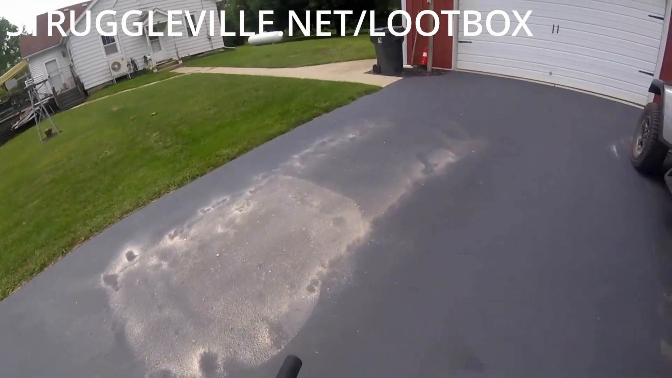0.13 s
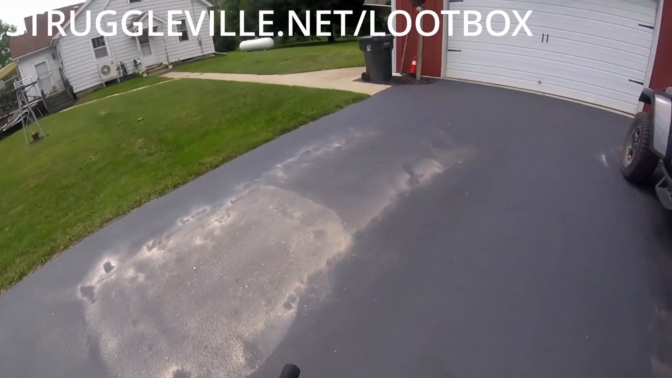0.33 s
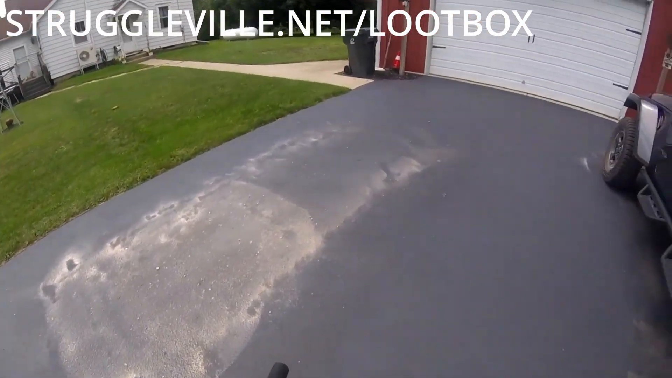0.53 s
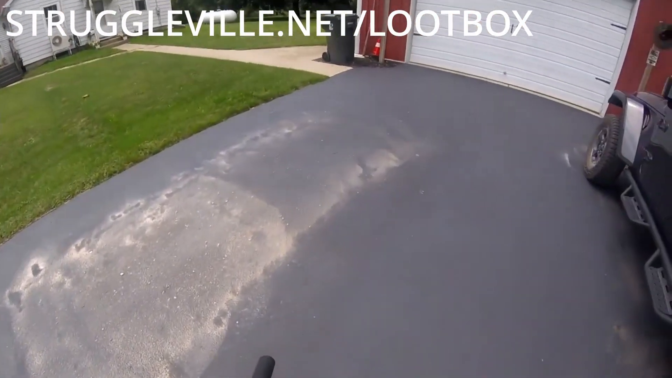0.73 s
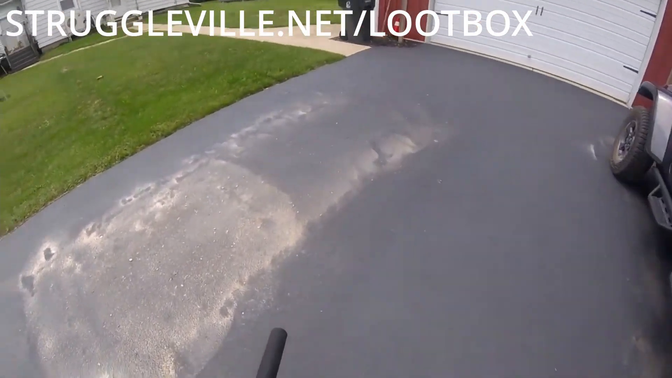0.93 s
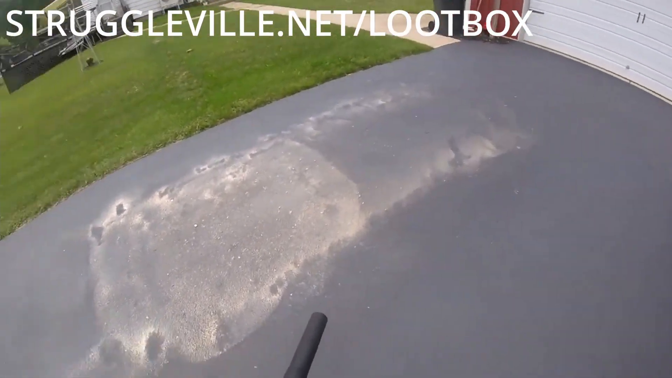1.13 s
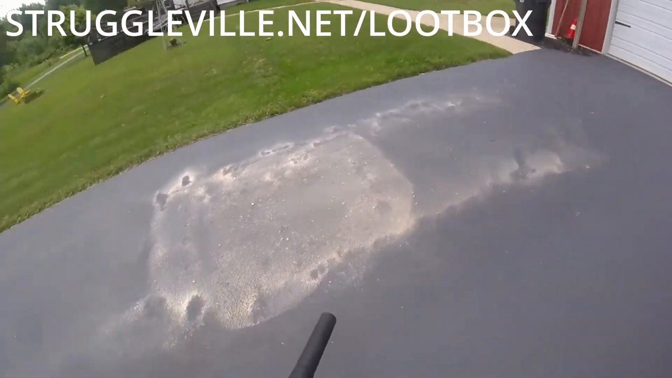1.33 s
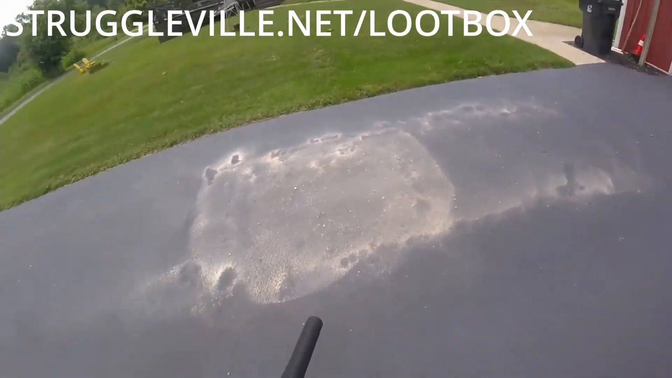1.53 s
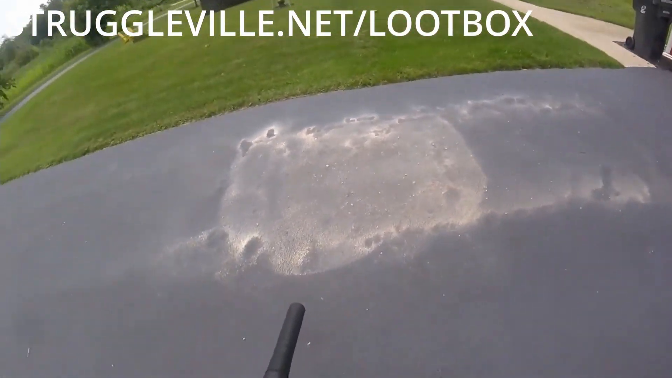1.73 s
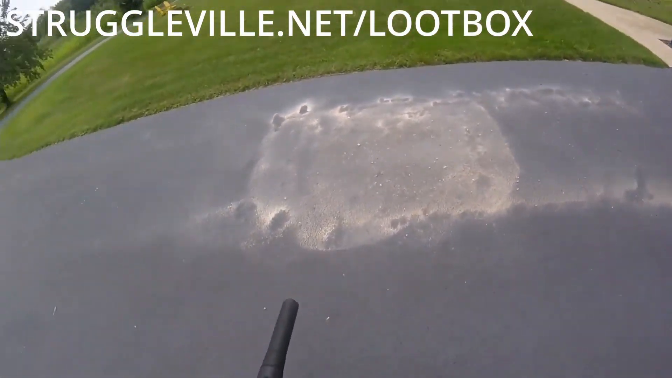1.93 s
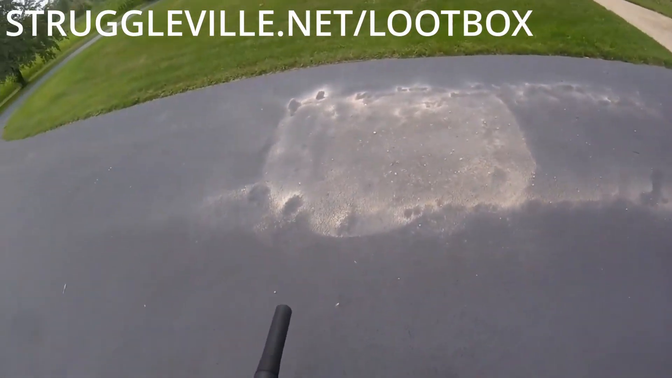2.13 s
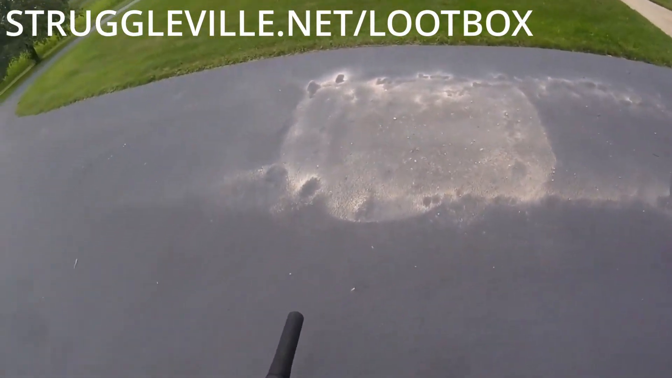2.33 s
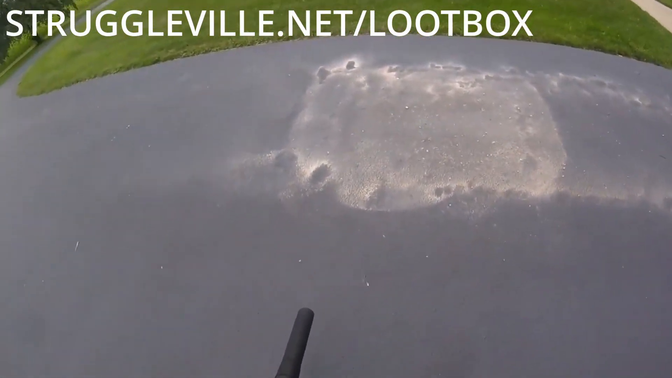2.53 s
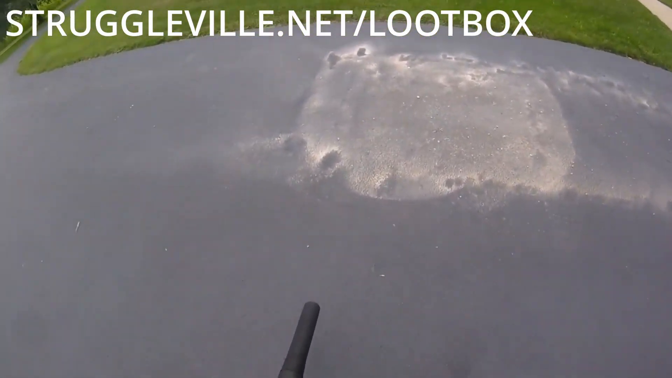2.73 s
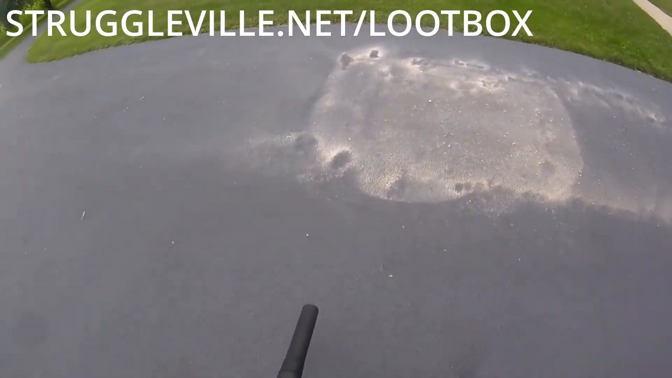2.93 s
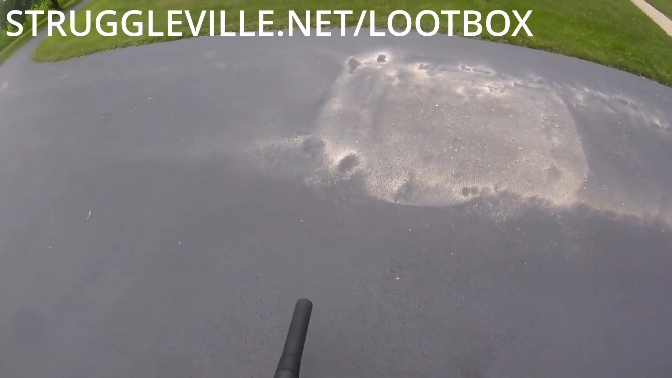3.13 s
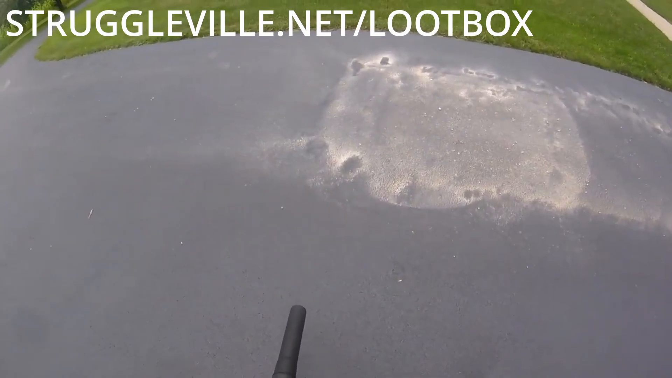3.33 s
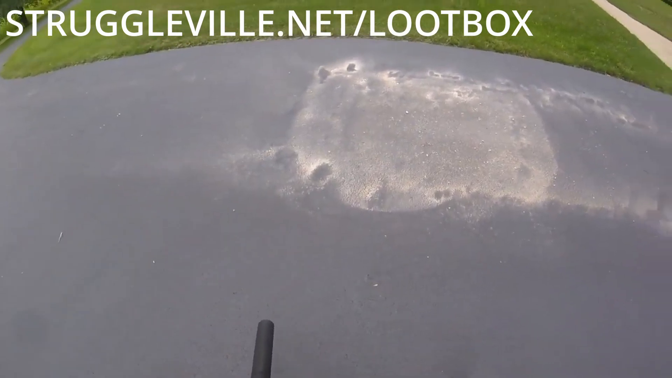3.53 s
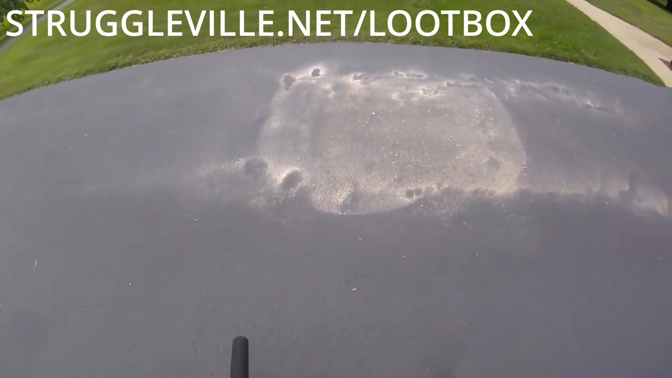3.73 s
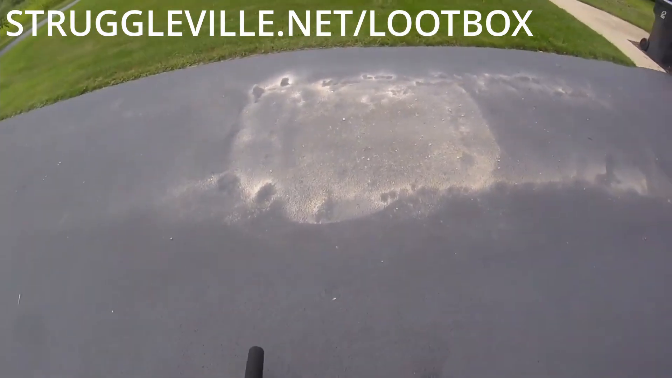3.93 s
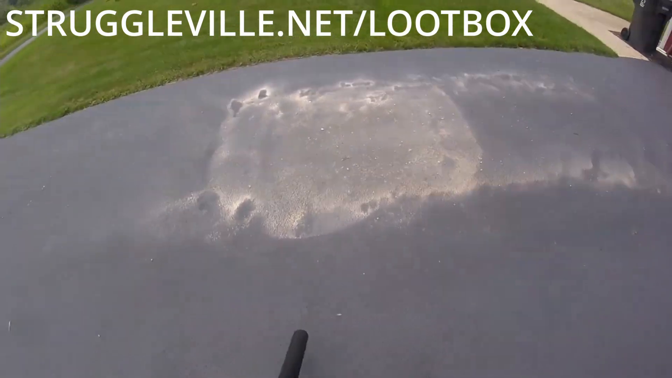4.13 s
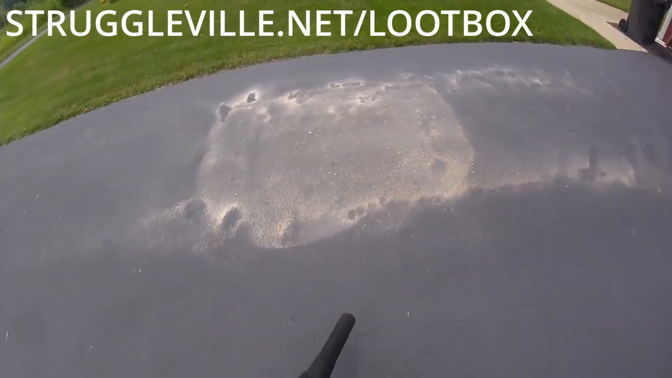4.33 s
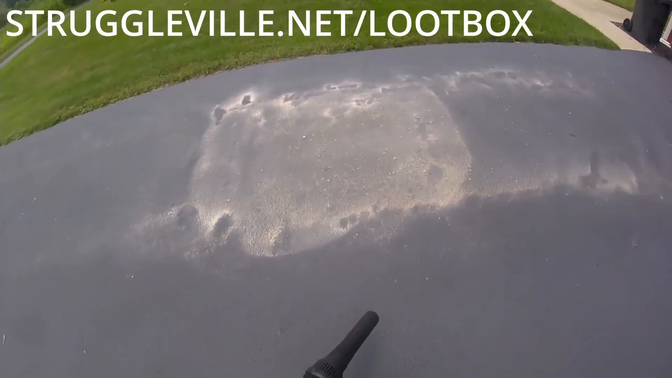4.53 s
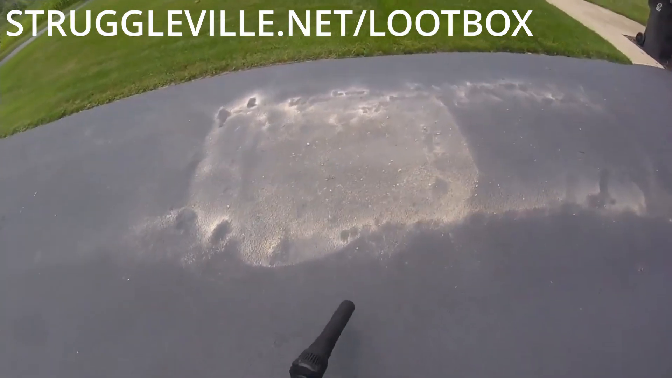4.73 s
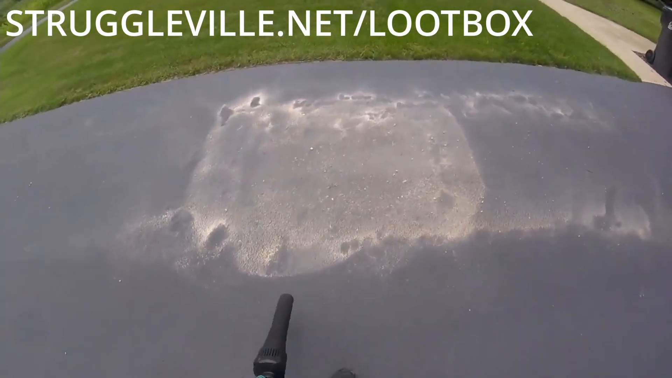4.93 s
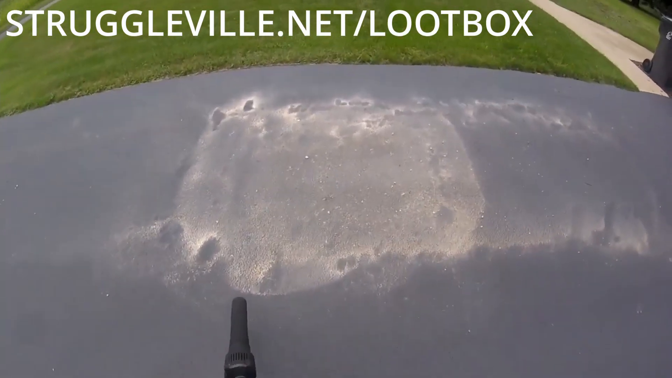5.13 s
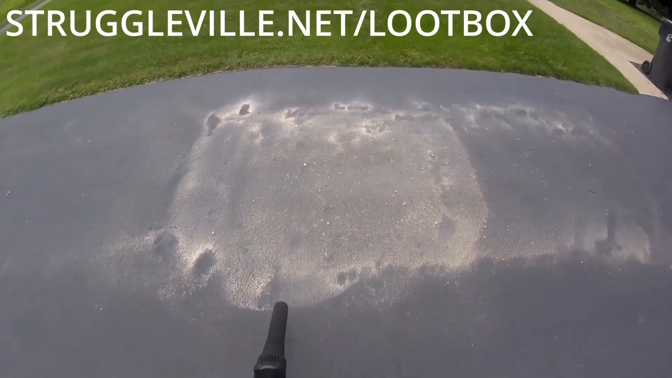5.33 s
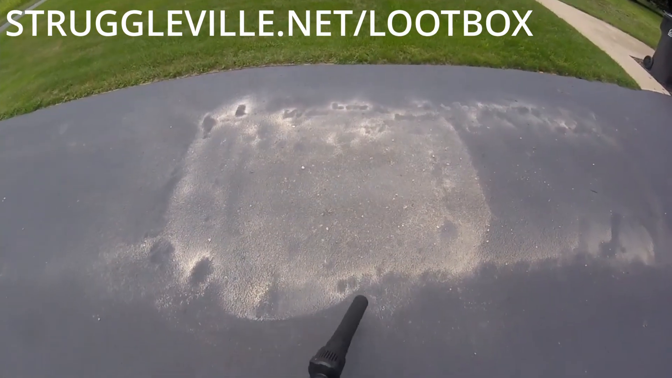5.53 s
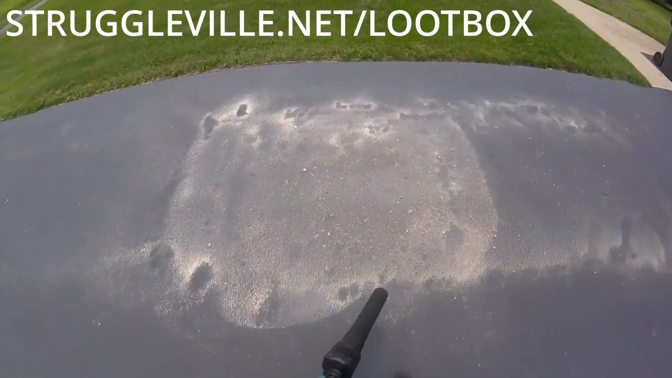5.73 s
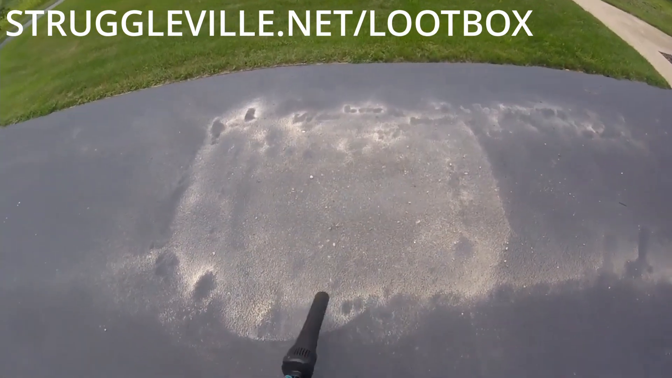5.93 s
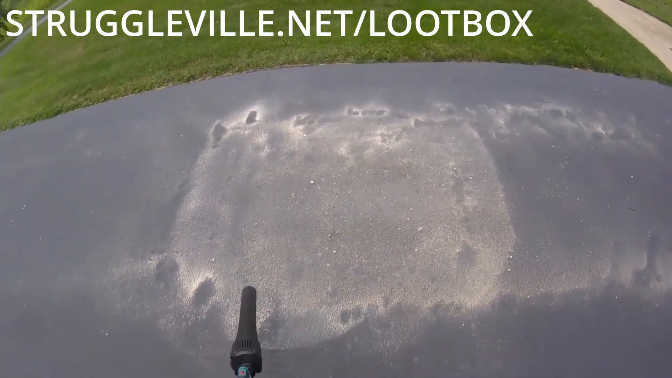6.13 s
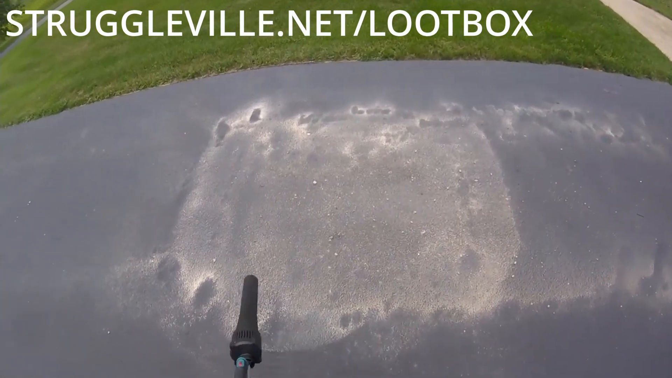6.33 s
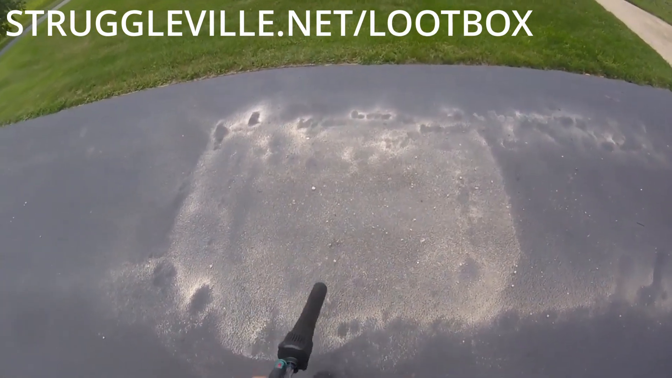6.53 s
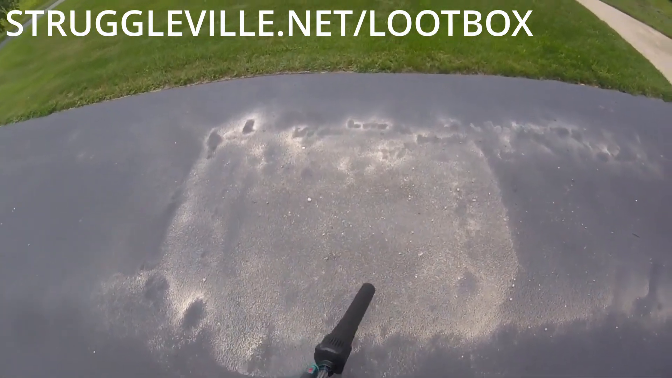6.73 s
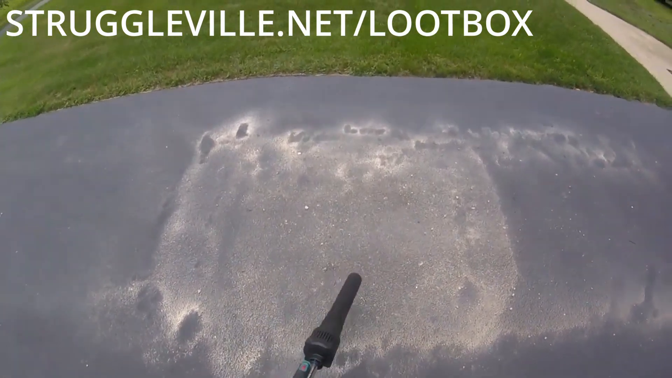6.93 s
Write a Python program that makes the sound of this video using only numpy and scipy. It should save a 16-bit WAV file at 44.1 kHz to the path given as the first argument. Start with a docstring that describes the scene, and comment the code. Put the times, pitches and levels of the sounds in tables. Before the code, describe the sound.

Quiet yard with soft wind thumps, then handle thuds and switch clicks as a cordless leaf blower whines up in steps to a steady, piercing rush.

```python
"""Outdoors, gusts thump the microphone of a small camera over a far hum and the quiet of a yard.
From about 1.3 s the handle thuds and the switch of a cordless leaf blower clicks; its first turn rasps.
The rotor leaps up at 1.46 s, then climbs in stages to full speed by about 3.5 s, and keeps running.
Tones locked to the rotor ride on noise bands for the rush of air and on noise ringing in the tube.
Only the left channel carries sound."""
import sys
import numpy as np
from scipy import signal
from scipy.io import wavfile
from scipy.ndimage import uniform_filter1d

SR = 44100
rng = np.random.default_rng(int(sys.argv[2]) if len(sys.argv) > 2 else 0)


def dump_mix(stems):
    """Bounce the given channels to the path in sys.argv[1] as a 16-bit WAV at rate SR."""
    frames = np.atleast_2d(stems).T  # one column per channel
    limited = np.clip(frames, -1, 1)  # hard clip at full scale
    pcm = np.round(limited * 32767).astype(np.int16)
    wavfile.write(sys.argv[1], SR, pcm)


N = 312669  # samples

BLADES = 13
KICK_IN_S, LEAP_PER_S, LEAP_S = 1.46, 135, 0.04  # start, turns per second of the leap, time constant
CREEP_PER_S, EASE_S = 0.5, 0.09  # turns per second gained while a stage is held; averaging of the ramps
# The drive ramps up in stages. Each row: start in seconds, length in seconds, turns per second reached.
SPEED_STAGES = [(1.46, .609, 357.3), (2.335, .175, 399.9), (2.797, .178, 438.4), (3.31, .2, 478.5)]
# Blade-passing frequency at full speed, wavering a little. Each row: time in seconds, frequency in Hz.
CRUISE_BLADE_TONE = [(3.7, 6226), (3.95, 6240), (4.12, 6228), (4.5, 6221), (4.65, 6212), (5.05, 6201),
                     (5.4, 6209), (6.05, 6196), (6.3, 6196), (6.55, 6208), (6.8, 6198), (7.09, 6199)]


def speed():
    """Rotor kinematics, in turns per second: an exponential approach, eased ramps, then the cruise."""
    knots, last = [], LEAP_PER_S
    for start, length, reached in SPEED_STAGES:
        knots += [(start, last), (start + length, reached)]
        last = reached + CREEP_PER_S
    knots += [(s, hz / BLADES) for s, hz in CRUISE_BLADE_TONE]
    # the first ramp is extended back to time 0, so that easing leaves its start straight
    _, first_length, first_reached = SPEED_STAGES[0]
    slope = (first_reached - LEAP_PER_S) / first_length
    knots[0] = (0, LEAP_PER_S - slope * KICK_IN_S)
    ramps = uniform_filter1d(curves(knots)[0], size=int(EASE_S * SR))
    since = np.arange(N) / SR - KICK_IN_S
    leap_left = LEAP_PER_S * np.exp(-abs(since) / LEAP_S)
    return np.where(since > 0, ramps - leap_left, 0)


# Slow level changes, first the burst of the start-up, later the swing of the tool.
# Each row: time in seconds, then three level changes in dB: ring of the tube
# (followed in part by the unbalance tone), whoosh, roar.
LEVEL_CHANGES = [(1.5, -20, 16, -5), (1.56, 11.5, -3, -2), (1.75, 2, 2, 2), (2.5, 3, -0.5, -0.5),
                 (3.4, 1.5, 0, -0.5), (3.7, 3, -2.5, -1), (4.0, -10.5, -3.5, -1), (4.4, -7.5, 0, -0.5),
                 (7.0, -9, -0.5, -1)]
UNBALANCE_DB, UNBALANCE_FOLLOW = -39.5, 0.64  # level before changes and airflow; share of the ring's change
# Tone at 4 x speed. Each row: time in seconds, level in dB.
MAGNET_LEVEL = [(1.64, -64), (1.8, -35), (1.95, -31), (2.2, -34.5), (2.5, -32), (3.7, -29), (4.2, -44),
                (4.45, -35), (4.7, -46), (4.95, -34), (6.2, -34.5), (6.45, -50), (6.7, -31), (7.0, -41)]
# Tones of the starting current. Each row: multiple of speed, on in seconds, off in seconds, level in dB,
# lift in dB where the tone meets the ring of the shell.
START_TONES = [(8, 1.54, 2.0, -40.5, 16.5), (16, 1.543, 1.635, -38, 14)]
RING_HZ, RING_WIDTH_HZ = 2500, 160  # the lift is halved one width away from the centre
START_RISE_DB_PER_S, START_FADE_DB_PER_S = 1400, 700
# Blade tone outside its drops. Each row: time in seconds, level in dB.
BLADE_LEVEL = [(1.6, -65), (1.73, -41), (1.86, -18), (2.24, -19.5), (2.4, -18.5), (2.5, -12), (2.79, -13.5),
               (2.95, -16), (3.14, -23.5), (3.45, -16.5), (3.62, -22), (3.7, -15), (3.96, -15), (4.2, -16),
               (4.45, -16), (4.6, -15.5), (5.5, -13.5), (5.85, -11), (6.0, -8.5), (7.07, -17)]
# Brief dips of the blade tone. Each row: middle in seconds, half length in seconds.
BLADE_DROPS = [(1.796, 0.048), (1.924, 0.042), (2.34, 0.04), (2.885, 0.041), (3.524, 0.038), (3.832, 0.025),
               (4.042, 0.028), (4.242, 0.059), (4.456, 0.053), (4.943, 0.046), (5.193, 0.03), (5.32, 0.016),
               (5.426, 0.017), (5.575, 0.012), (5.664, 0.015), (5.803, 0.094), (5.935, 0.029),
               (6.038, 0.049), (6.159, 0.035), (6.233, 0.022), (6.342, 0.037), (6.43, 0.039),
               (6.553, 0.011), (6.69, 0.034), (6.857, 0.021), (7.023, .03)]
DROP_DEPTH = 0.93  # share of the amplitude lost
CHOP_HZ = 12900  # the drive chops the current at this fixed rate
# Side tones of the chopping rate. Each row: multiple of speed added to it, level in dB before the fade.
CHOP_TONES = [(4, -70), (-4, -70), (-8, -66)]
# Each row: time in seconds, level change of the chopping tones in dB.
CHOP_FADE = [(1.44, -5), (1.52, 9), (2.0, 0), (2.2, -12), (2.3, -60)]


def motor(per_s):
    """Harmonics of rotation: forces repeat with the turn, and the chopping rate is split by the speed."""
    t = np.arange(N) / SR
    turns = np.cumsum(per_s) / SR
    unbalance_db = UNBALANCE_DB + UNBALANCE_FOLLOW * curves(LEVEL_CHANGES)[0]
    unbalance_db = unbalance_db + 0.7 * np.minimum(airflow(per_s), 0)
    out = tone(turns, unbalance_db, rough=0.4, blur_s=0.25)
    out += tone(4 * turns, curves(MAGNET_LEVEL)[0], rough=0.2, blur_s=0.08)

    for k, on, off, db, lift_db in START_TONES:
        lift = lift_db / (1 + ((k * per_s - RING_HZ) / RING_WIDTH_HZ) ** 2)
        level = held(on, off, db, START_RISE_DB_PER_S, START_FADE_DB_PER_S) + lift
        out += tone(k * turns, level, rough=0.093, blur_s=0.033)

    steady = np.ones(N)
    for middle, half in BLADE_DROPS:
        steady *= 1 - DROP_DEPTH * np.exp(-((t - middle) / half) ** 2)
    out += steady * tone(BLADES * turns, curves(BLADE_LEVEL)[0], rough=0.05, blur_s=0.025)

    fade_db = curves(CHOP_FADE)[0]
    for k, db in CHOP_TONES:
        out += gain_of(db + fade_db) * np.sin(2 * np.pi * (CHOP_HZ * t + k * turns))
    return out


KNEE_PER_S, BELOW_DB, ABOVE_DB = 359, 56.5, 5.5  # turns per second; dB per decade below and above


def airflow(per_s):
    """Level of the air noise in dB from the knee: steep with log speed up to it, far flatter above."""
    decades = np.log10(per_s / KNEE_PER_S + 1e-3)
    return np.where(decades < 0, BELOW_DB, ABOVE_DB) * decades


ROAR_DB, WHOOSH_DB, HISS_DB = -24.5, -21.5, -18  # at the knee, before the slow level changes
ROAR_SHARE, WHOOSH_SHARE = 0.63, 1.32  # of the growth of the hiss
# Noise spectra of the low roar, the whoosh and the high hiss.
# Each row: frequency in Hz, relative level in dB per Hz.
ROAR_COLOUR = [(60, -56), (100, -22), (265, -14), (460, -12.5), (630, -12.5), (800, -2), (1100, -2.5),
               (1320, -2.5), (1580, -6.5), (1860, -2.5), (2200, -5.5), (2600, -5), (2950, -4.5), (3400, -7),
               (3700, -12.5), (4700, -29)]
WHOOSH_COLOUR = [(3300, -9), (3600, -1), (4500, 0.5), (5400, 2.5), (5900, -6)]
HISS_COLOUR = [(3240, -31), (5500, -19), (5940, -3), (6010, -4), (6430, 0.5), (7090, -13), (8530, -17.5),
               (9210, -26), (11200, -28.5), (12300, -38.5), (14400, -50.5)]
TUBE_DB = -29.5  # common level of the ring, before the resonance, slow changes and drive
# Resonances of the open tube. Each row: frequency in Hz, width in Hz of the narrower of two filters,
# relative level in dB, how far it follows the slow change of the ring from 0 to 1.
TUBE_MODES = [(393.7, 61, 1, 1), (782.5, 96, 6, 0.4), (2564, 170, -2, 0.8), (3160, 150, -4, 0.2),
              (3780, 180, 1.5, 1), (4220, 61, 0.5, 0.74)]


def air(per_s):
    """Turbulence from fan, inlet and jet is broadband noise; the open tube resonates."""
    flow_db = airflow(per_s)
    ring_change_db, whoosh_change_db, roar_change_db = curves(LEVEL_CHANGES)
    roar_db = roar_change_db + ROAR_DB + ROAR_SHARE * flow_db
    whoosh_db = whoosh_change_db + WHOOSH_DB + WHOOSH_SHARE * flow_db
    out = gain_of(roar_db) * noise(ROAR_COLOUR, size=1024, patchy_db=1.5)
    out += gain_of(whoosh_db) * noise(WHOOSH_COLOUR, size=512, patchy_db=0.7)
    out += gain_of(HISS_DB + flow_db) * noise(HISS_COLOUR, size=512, patchy_db=1.1)
    for hz, width, db, follow in TUBE_MODES:
        ring = resonate(resonate(rng.standard_normal(N), hz, width), hz, 2 * width)
        # the upper resonances need fast air to sound
        if hz > 2000:
            drive_db = np.minimum(whoosh_db + 16.5, 0)
        else:
            drive_db = 0.6 * np.minimum(roar_db + 14.0, 0)
        out += gain_of(TUBE_DB + db + follow * ring_change_db + drive_db) * evened(ring)
    return out


ECHO_S, ECHO_SWAY_S, ECHO_DB = 0.00225, 0.00008, -16  # mean delay, rms sway, level of the bounce


def ground(x):
    """Comb filtering: a bounce off the asphalt adds a later copy, and its path sways with the arm."""
    t = np.arange(N) / SR
    sway = np.zeros(N)
    for f in np.geomspace(0.3, 3, 12):
        sway += np.sin(2 * np.pi * (f * t + rng.random())) / np.sqrt(f)
    delay = ECHO_S + ECHO_SWAY_S * evened(sway)
    return x + gain_of(ECHO_DB) * np.interp(t - delay, t, x)


# Trigger and switch clicks. Each row: start in seconds, level in dB of the burst that strikes the shell,
# brightness in dB per octave about 2500 Hz, time in seconds for the burst to fall by 60 dB.
CLICKS = [(1.276, -39.5, -14.5, 0.068), (1.395, -17, 9, 0.014), (1.438, -17, 0, 0.036),
          (1.465, -20, 0, .012)]
# Resonances of the plastic shell. Each row: frequency in Hz, width in Hz of the narrower of two filters,
# relative level in dB.
SHELL_MODES = [(600, 670, -20), (1390, 640, -5), (2370, 210, 0), (3060, 210, -1), (5470, 340, -11),
               (6630, 350, -6), (7600, 1030, -7)]
RASP_ON_S, RASP_OFF_S, RASP_DB = 1.474, 1.535, -30  # level of its resonant part
RASP_RISE_DB_PER_S, RASP_FALL_DB_PER_S = 3000, 278
RASP_WIDE_DB = -6.5  # broadband part, relative to the resonant part


def switch():
    """Impulse excitation: short bursts ring the modes of the shell, then the first turn rasps."""
    out = np.zeros(N)
    t = np.arange(4000) / SR
    for s, db, bright_db, t60 in CLICKS:
        burst = gain_of(db - 60 * t / t60) * rng.standard_normal(len(t))
        start = round(s * SR)
        for hz, width, mode_db in SHELL_MODES:
            ring = resonate(resonate(burst, hz, width), hz, 3 * width)
            out[start:start + len(t)] += gain_of(mode_db + bright_db * np.log2(hz / 2500)) * ring
    rasp = evened(resonate(resonate(rng.standard_normal(N), 2550, 450), 2550, 550))
    rasp += gain_of(RASP_WIDE_DB) * noise(ROAR_COLOUR, size=256, patchy_db=3.5)
    level = held(RASP_ON_S, RASP_OFF_S, RASP_DB, RASP_RISE_DB_PER_S, RASP_FALL_DB_PER_S)
    return out + gain_of(level) * rasp


# The hand tightens on the handle and thuds through to the camera. Each row: start in seconds,
# level in dB of the envelope around the flattened wave, frequency in Hz, length in seconds.
GRIP_THUDS = [(1.269, -25, 38.7, 0.077), (1.28, -20, 96, 0.045), (1.319, -16, 117.5, 0.046),
              (1.34, -13.5, 35.3, 0.048), (1.374, -16.5, 89, .035), (1.409, -10, 81, 0.029),
              (1.467, -21, 72, 0.033)]
SQUEEZE = 0.62  # drive into the flattening of the wave tops


def grip():
    """Structure-borne sound: each thud is a few soft cycles, whose flattened tops add overtones."""
    out = np.zeros(N)
    for s, db, hz, length in GRIP_THUDS:
        t = np.arange(0, length, 1 / SR)
        wave = np.tanh(SQUEEZE * np.sin(2 * np.pi * (hz * t + rng.random())))
        start = round(s * SR)
        out[start:start + len(t)] += gain_of(db) * np.hanning(len(t)) * wave
    return out


# Gusts on the microphone. Each row: start in seconds, end in seconds, level in dB.
GUSTS = [(0, 0.322, -34), (.4, .6, -45), (0.67, 0.8, -35), (.9, 1.197, -40.5), (1.275, 1.43, -29),
         (1.5, 1.9, -39.5), (4.186, 4.5, -41), (4.6, 5.3, -54), (5.92, 6.027, -44)]
CALM_DB, GUST_RISE_DB_PER_S, GUST_FALL_DB_PER_S = -54, 200, 100  # wind between gusts; gust edges
# Noise spectra of the wind and of the quiet yard.
# Each row: frequency in Hz, relative level in dB per Hz.
WIND_COLOUR = [(8.8, -32), (15, 0.5), (60, 7), (125, -24.5), (162, -24), (231, -23), (300, -44), (390, -84),
               (660, -120)]
YARD_COLOUR = [(88, -31), (150, 1.5), (200, -14), (390, -10), (509, -14), (628, -16), (691, -11),
               (1110, -15), (5430, -27.5), (6580, -17.5), (10600, -32.5), (12400, -30.5), (14400, -39)]
HUM_HZ, HUM_DB, YARD_DB = 72.5, -52.5, -54.5


def outdoors():
    """Ambient sound: wind pressure buffets as low noise, over a far hum and the noise of the yard."""
    gusts = [held(*row, GUST_RISE_DB_PER_S, GUST_FALL_DB_PER_S) for row in GUSTS]
    wind_db = np.maximum(np.max(gusts, axis=0), CALM_DB)
    wind = gain_of(wind_db) * noise(WIND_COLOUR, size=2048, patchy_db=0.6)
    hum = tone(HUM_HZ * np.arange(N) / SR, HUM_DB, rough=0.06, blur_s=0.2)
    yard = gain_of(YARD_DB) * noise(YARD_COLOUR, size=1024, patchy_db=1.5)
    return wind + hum + yard


def tone(turns, db, rough, blur_s):
    """Scattering by moving air: a share of the sine's power wanders in height and phase."""
    smooth = signal.windows.hann(int(blur_s * SR))
    a, b = (evened(signal.oaconvolve(x, smooth, "same")) for x in rng.standard_normal((2, N)))
    scatter = a + 1j * b
    wave = (np.sqrt(2 * (1 - rough)) + np.sqrt(rough) * scatter) * np.exp(2j * np.pi * turns)
    return gain_of(db) * wave.real


def noise(colour, size, patchy_db):
    """Spectral shaping: random short-time spectra with drifting patches, scaled to rms 1."""
    hz = np.fft.rfftfreq(size, 1 / SR)
    frames = 4 * N // size + 5
    a, b, patches = rng.standard_normal((3, len(hz), frames))
    patches = uniform_filter1d(uniform_filter1d(patches, size=10, axis=0), size=10, axis=1)
    f, db = np.transpose(colour)
    shape = np.interp(np.log(hz + 1), np.log(f + 1), db, -120, -120)
    spectra = (a + 1j * b) * gain_of(shape[:, None] + patchy_db * evened(patches))
    _, x = signal.istft(spectra, nperseg=size, noverlap=3 * size // 4)
    return evened(x[:N])


def resonate(x, hz, width):
    """Resonance: a second-order filter passes its centre frequency at gain 1."""
    return signal.lfilter(*signal.iirpeak(hz, hz / width, SR), x)


def held(on, off, db, rise_db_per_s, fall_db_per_s):
    """Exponential growth and decay: a level in dB rises in a line up to on, holds until off and falls."""
    t = np.arange(N) / SR
    return db - rise_db_per_s * np.maximum(on - t, 0) - fall_db_per_s * np.maximum(t - off, 0)


def curves(rows):
    """Linear interpolation of every column at every sample; -120 before the table, last value after."""
    s, *columns = np.transpose(rows)
    t = np.arange(N) / SR
    return [np.interp(t, s, column, -120, column[-1]) for column in columns]


def gain_of(db):
    """Logarithmic level: decibels become an amplitude factor."""
    return 10 ** (np.asarray(db) / 20)


def evened(x):
    """Power normalisation: scales to rms 1."""
    return x / np.sqrt(np.mean(x ** 2) + 1e-20)


def scene():
    """Superposition: all sources add at the one working microphone, on the left."""
    per_s = speed()
    left = motor(per_s) + ground(air(per_s)) + switch() + grip() + outdoors()
    return np.array([left, np.zeros(N)])


def record(dry):
    """Band limiting: a steep low-pass filter keeps next to nothing above the camera's band edge."""
    low_pass = signal.firwin(1023, 14450, window=("kaiser", 10), fs=SR)  # edge in Hz
    return signal.oaconvolve(dry, low_pass[None], "same")


dry = scene()
out = record(dry)
dump_mix(out)
```